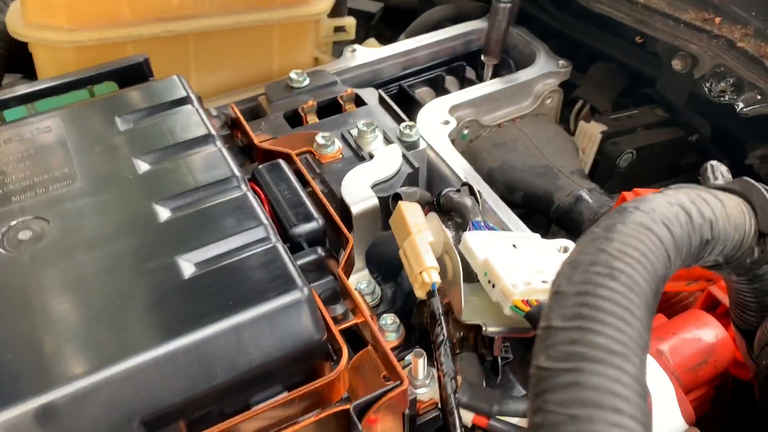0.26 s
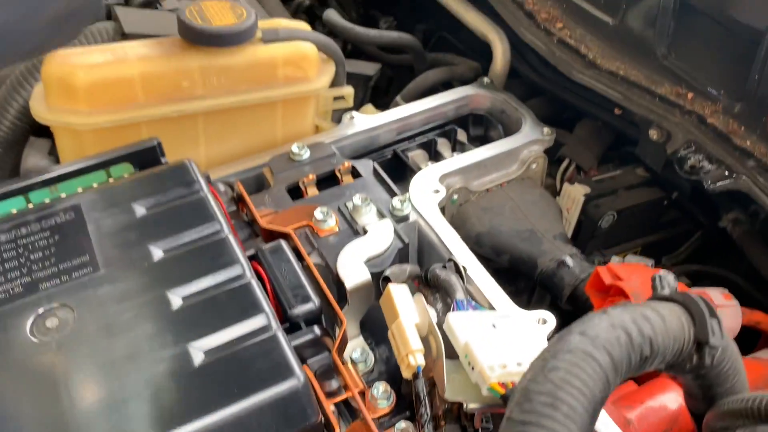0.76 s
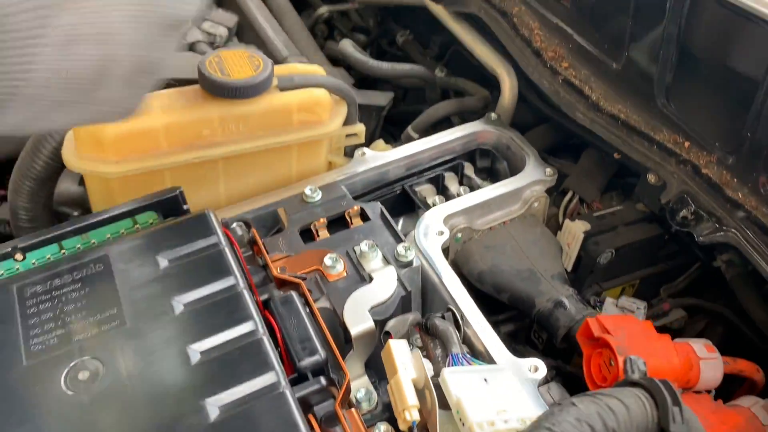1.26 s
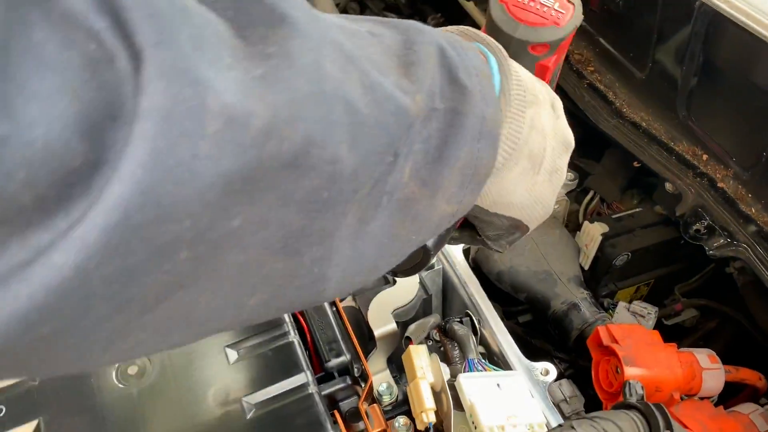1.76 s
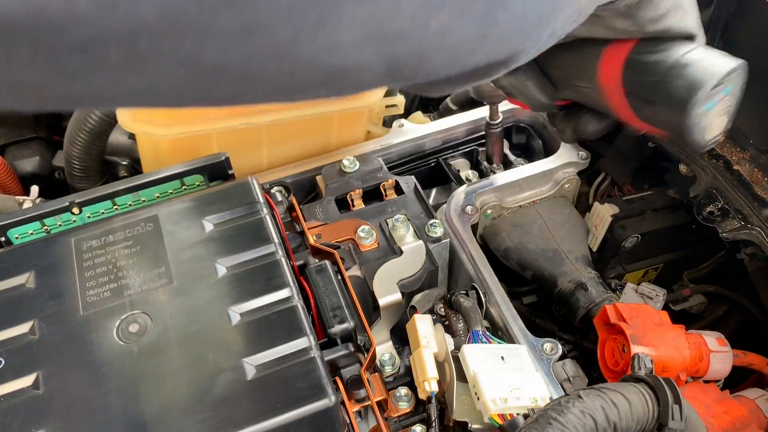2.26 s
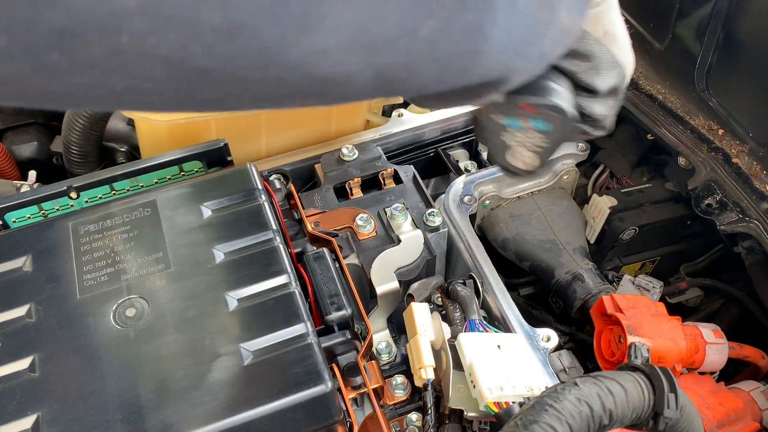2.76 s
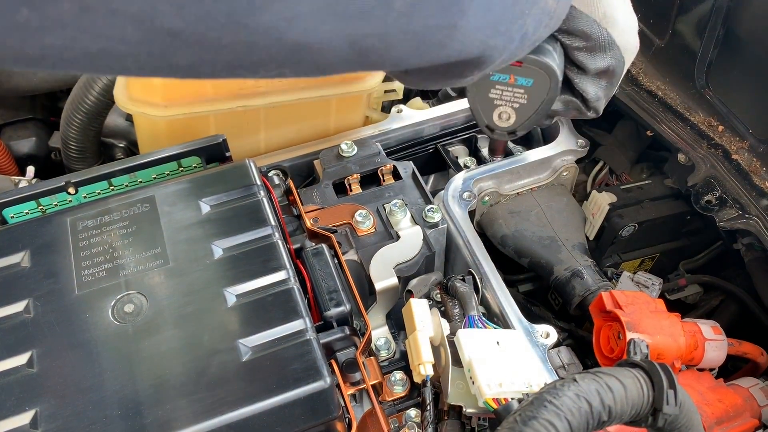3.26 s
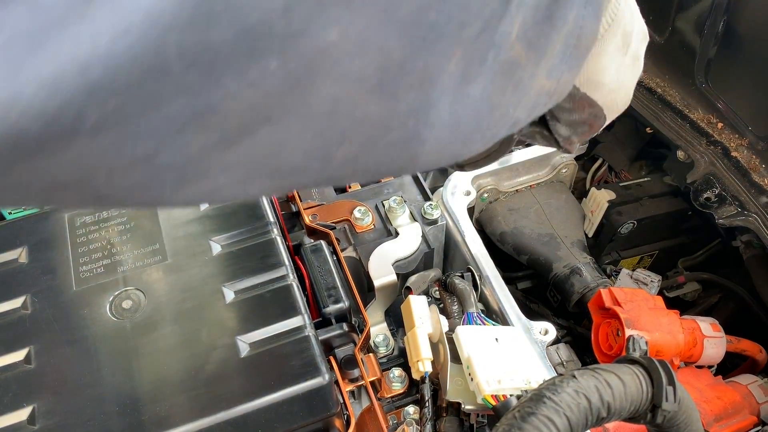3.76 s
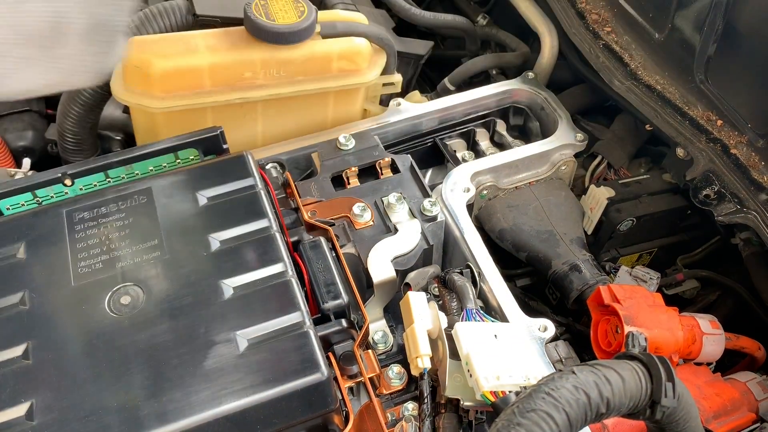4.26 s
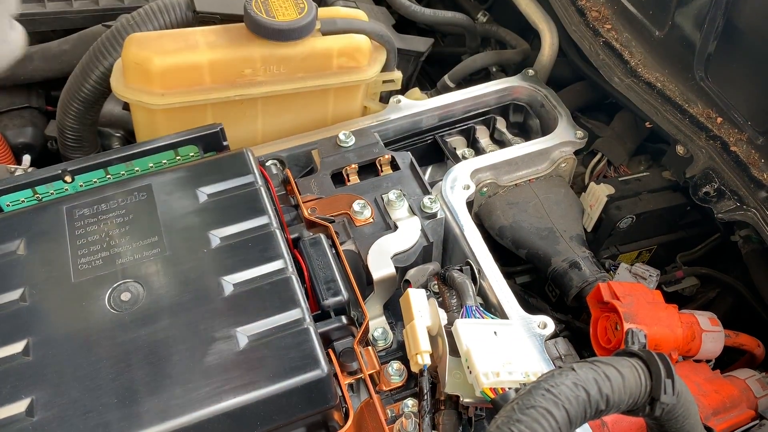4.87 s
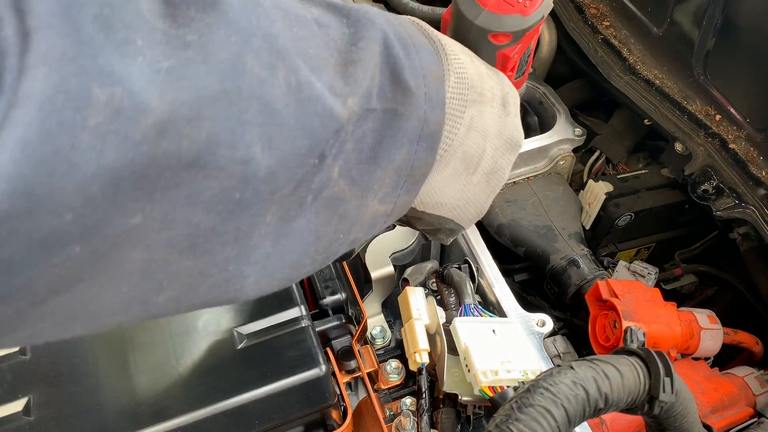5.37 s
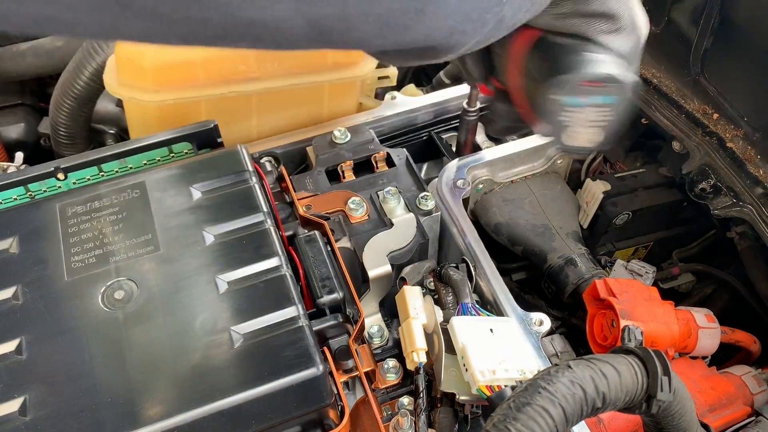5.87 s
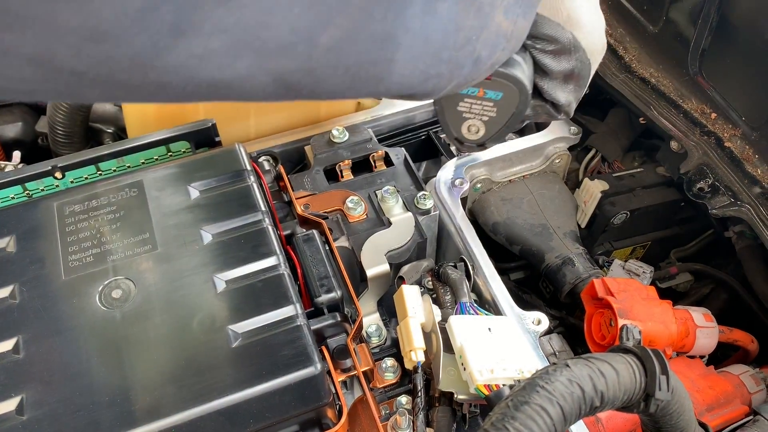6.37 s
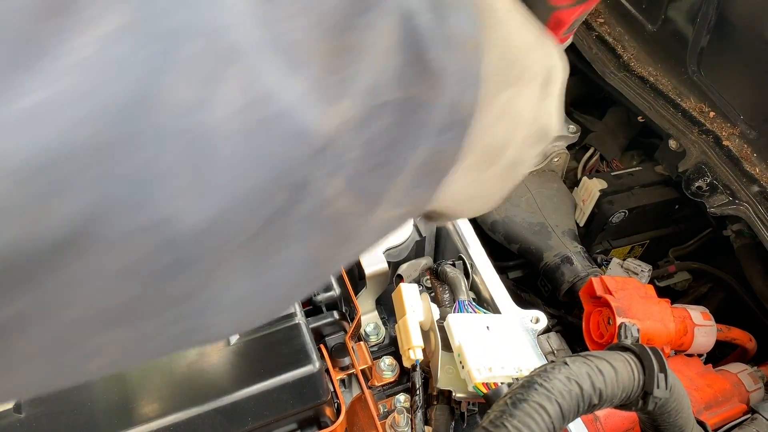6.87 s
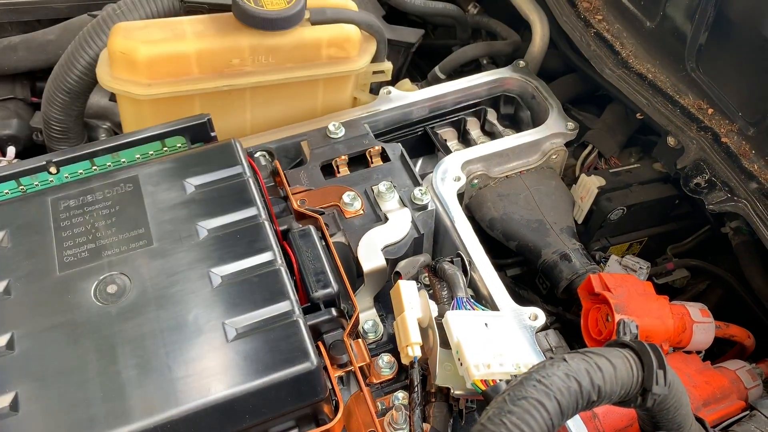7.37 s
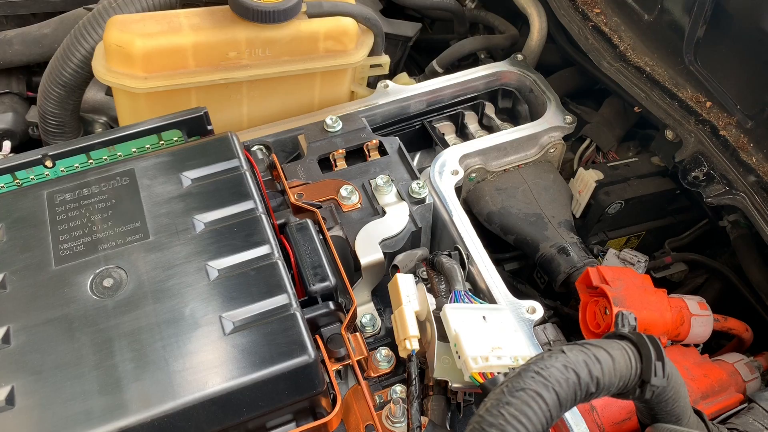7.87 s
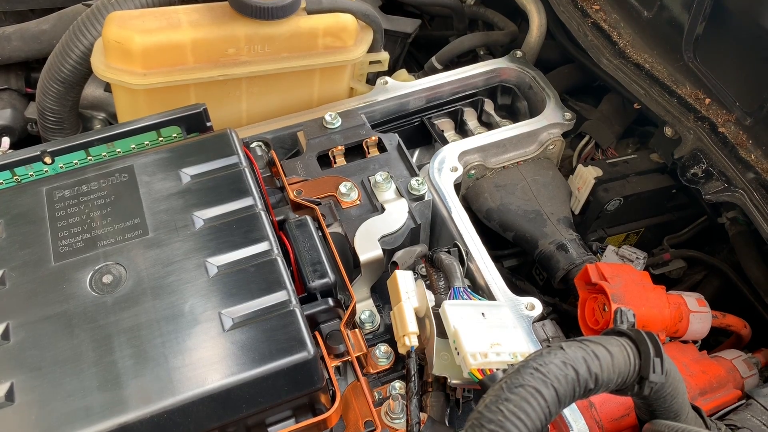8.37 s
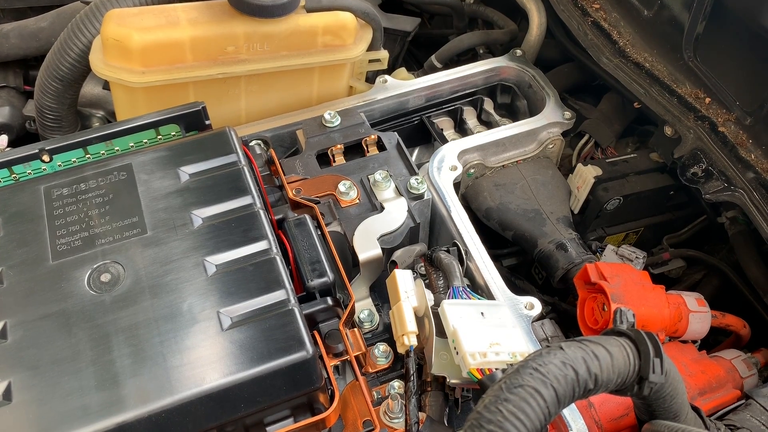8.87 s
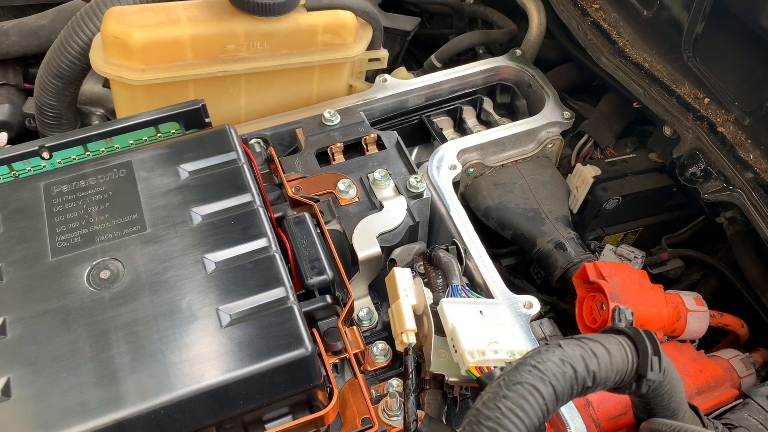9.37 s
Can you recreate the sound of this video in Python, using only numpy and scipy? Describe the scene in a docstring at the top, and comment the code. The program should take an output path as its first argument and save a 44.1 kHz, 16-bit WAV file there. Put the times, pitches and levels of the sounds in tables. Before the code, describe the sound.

Close up in an engine bay, a power driver loosens bolts in three clattering bursts, its socket knocking between them, before soft hiss and a brief drag.

```python
"""Impact driver in an engine bay

In a car's engine bay, close to the microphone, a cordless impact driver backs bolts out of an aluminium housing.
Gears whirr and whine with the motor, hammer blows clash in volleys, and the metal rings at its modes.
Between runs the socket knocks, rubs and rattles, a sleeve swishes and small parts tick; near the end
something scrapes. Behind, a workshop rumbles, far chirps come late and a soft hiss swells and stays."""
import sys
import numpy as np
from scipy import signal
from scipy.fft import rfft, irfft, next_fast_len
from scipy.io import wavfile
from scipy.ndimage import map_coordinates

SR = 44100
rng = np.random.default_rng(int(sys.argv[2]) if len(sys.argv) > 2 else 0)


def generate_wav(signal):
    """Clip the signal to [-1, 1] and save it as 16-bit WAV at the path in sys.argv[1]."""
    frames = np.transpose(np.atleast_2d(signal))
    scaled = np.clip(frames, -1, 1) * 32767
    pcm = np.round(scaled).astype(np.int16)
    wavfile.write(sys.argv[1], SR, pcm)


N = 424683
TIME = np.arange(N) / SR


def amp(db):
    """Amplitude of a level in dB."""
    return 10 ** (np.asarray(db) / 20)


def unit(x):
    """x scaled to rms 1."""
    return x / np.sqrt(np.mean(x ** 2) + 1e-20)


def along(points, hz):
    """Values at hz between (f/Hz, value) points, on a log frequency axis."""
    f, v = np.transpose(points)
    return np.interp(np.log(hz + 1), np.log(f + 1), v)


def wobble(rate):
    """A smooth random curve with this many knots a second."""
    knots = rng.standard_normal(int(N * rate / SR) + 4)
    return map_coordinates(knots, [TIME * rate], order=2)


def filtered(x, response):
    """x times a response of frequency."""
    m = next_fast_len(N + SR // 4)
    return irfft(rfft(x, m) * response(np.fft.rfftfreq(m, 1 / SR)), m)[..., :N]


# stereo width of the work close to the microphone: (f/Hz, side minus mid level/dB)
NEAR_WIDTH = [(60, -19), (87, -17.5), (130, -21), (180, -14), (260, -8), (380, -12.5), (550, -8),
              (790, 2.5), (1140, -3), (1650, -15.5), (2380, 1), (3440, 3), (4970, 5.5), (7180, -12),
              (10400, 1.5), (15000, 3.5)]
# stereo width of the workshop and of low or dragging sounds: (f/Hz, side minus mid level/dB)
SHOP_WIDTH = [(30, -29), (120, -20.5), (300, -2), (1000, 8), (4000, 1.5)]


def noise(spectrum, width, grain_db=0, patchy_db=0, direct=True):
    """Stereo noise of rms 1 in grains and patches; direct sound differs between the ports mostly in phase."""
    pair = rng.standard_normal((2, N)) * amp(grain_db * wobble(1500))
    if patchy_db:
        # patches in time and frequency, alike in both channels
        z = signal.stft(pair, nperseg=512)[2]
        patch = np.outer(np.hanning(5), np.hanning(9))
        field = signal.fftconvolve(rng.standard_normal(z.shape[1:]), patch, "same")
        pair = signal.istft(z * amp(patchy_db * unit(field)), nperseg=512)[1][:, :N]
    size = next_fast_len(N)
    hz = np.fft.rfftfreq(size, 1 / SR)
    mid, other = rfft(pair, size)
    phase_share = .82 if direct else 0  # power of the side that is the mid turned a quarter cycle
    side = 1j * np.sqrt(phase_share) * mid + np.sqrt(1 - phase_share) * other
    side = amp(along(width, hz)) * side
    stereo = np.array([mid + side, mid - side])
    return unit(irfft(amp(along(spectrum, hz)) * stereo, size)[:, :N])


def bursts(rows):
    """Envelope of contacts (t/s, level/dB, rise/s per 20 dB, t60/s): each swells to its peak and dies away."""
    power = np.zeros(N)
    for s, db, rise, t60 in rows:
        near = slice(max(int((s - .05) * SR), 0), int((s + .4) * SR))
        t = TIME[near] - s
        slope_db = np.where(t < 0, 20 * t / max(abs(rise), 1e-4), -60 * t / t60)
        power[near] += amp(db + slope_db) ** 2
    return np.sqrt(power)


def swells(rows):
    """Envelope of smooth bell-shaped strokes (t/s, level/dB, half length/s)."""
    return sum(amp(db) * np.exp(-np.minimum(((TIME - s) / half) ** 2, 50)) for s, db, half in rows)


# modes of the aluminium housing: (f/Hz, level/dB, t60/s)
HOUSING_MODES = [(138.6, -5, 0.18), (271.1, -9.5, 0.66), (311, -9, .2), (542.2, -1, .25), (599, -6, 0.18),
                 (610.7, -3.5, 0.25), (1093, 2, 0.1), (1200, -11.5, 0.043), (1461, -7.5, 0.086),
                 (1580, -5.5, .07), (1840, -4.5, 0.069), (2180, -8.5, 0.14), (2465, -4.5, 0.085),
                 (2703, -6.5, 0.063), (5992, -1.5, 0.075), (6320, -6.5, 0.053), (7680, 0, 0.03),
                 (8200, 1.5, .05)]
# modes of the casting around the first bolt: (f/Hz, level/dB, t60/s)
CORNER_MODES = [(553, 4, 0.11), (686, 3.5, .14), (763, 0.5, 0.12), (2090, -2.5, .08)]
# modes of the socket extension under load: (f/Hz, level/dB, t60/s)
EXTENSION_MODES = [(536, -2, 0.057), (590, 0, 0.046), (1087, -5.5, 0.08), (2660, -8, .05)]


def casting(x, modes):
    """A metal part's decaying modes, of random phase, rung by the force x."""
    t = np.arange(SR // 2) / SR
    ring = np.zeros(len(t))
    for hz, db, t60 in modes:
        ring += amp(db - 60 * t / t60) * np.sin(2 * np.pi * hz * t + rng.uniform(0, 2 * np.pi))
    return signal.fftconvolve(x, ring[None] / np.linalg.norm(ring), axes=1)[:, :N]


# decay of the engine bay's answer: (f/Hz, t60/s)
BAY_DECAY = [(200, .35), (1500, 0.28), (10000, 0.09)]


def bay(x):
    """Bonnet and walls answer with a tail of decaying noise; the treble dies first."""
    hz, t, z = signal.stft(rng.standard_normal((2, SR // 2)), SR, nperseg=256)
    decay = amp(-60 * t / along(BAY_DECAY, hz)[:, None])
    tail = signal.istft(z * decay, SR, nperseg=256)[1]
    return signal.fftconvolve(x, tail / np.linalg.norm(tail[0]), axes=1)[:, :N]


# bands where the two ports move against each other: (f/Hz, width/Hz, depth/dB)
ANTIPHASE = [(3164, 310, 4.5), (4930, 470, 6.5)]


def ports(x):
    """Sound bends round the microphone body; in narrow bands what both ports share cancels."""
    mid = x.mean(axis=0)

    def dips(hz):
        return amp(-sum(db * np.exp(-((hz - centre) / width) ** 2) for centre, width, db in ANTIPHASE))

    return x - mid + filtered(mid, dips)


# spectrum of the low rumble: (f/Hz, level/dB per Hz)
RUMBLE = [(12, -31), (20, -5), (43, 2), (91, -3.5), (123, -3.5), (204, -16.5), (291, -16.5), (328, -28),
          (358, -15.5), (386, -23.5), (700, -37.5), (910, -60.5), (1540, -120)]
# spectrum of the far wash: (f/Hz, level/dB per Hz)
SHOP = [(290, -30.5), (500, -20.5), (729, -6.5), (933, -9), (1090, -7.5), (1840, -10.5), (2100, -16),
        (4470, -27), (5240, -24), (16000, -45.5)]
# spectrum of the late hiss: (f/Hz, level/dB per Hz)
HISS = [(1180, -35.5), (2000, -4), (4940, -4), (8400, -4.5), (11300, -14), (12100, -34), (13300, -18.5),
        (16000, -16)]
HISS_DB, HISS_MIDWAY_S, HISS_SWELL_S = -55.5, 7.65, .16


def workshop():
    """Far behind: shaped noise as a swaying rumble, a thin wash, and a soft hiss that swells late and stays."""
    rumble = amp(-44 + .9 * wobble(6)) * noise(RUMBLE, SHOP_WIDTH, direct=False)
    wash = amp(-58.5 + 1.2 * wobble(5.1)) * noise(SHOP, SHOP_WIDTH, patchy_db=2, direct=False)
    hiss_gain = amp(HISS_DB) / (1 + np.exp((HISS_MIDWAY_S - TIME) / HISS_SWELL_S))
    return rumble + wash + hiss_gain * noise(HISS, SHOP_WIDTH, direct=False)


# the driver's runs: (trigger squeezed t/s, bolt breaks loose t/s, trigger released t/s,
# free motor speed f/Hz, whirr level/dB)
RUNS = [(-0.4, -0.299, 0.125, 364, -19.5), (3.032, 3.15, 3.514, 417.8, -19.5),
        (6.063, 6.16, 6.555, 414.6, -20)]
ATTACK_S, ATTACK_DB, RELEASE_DB_PER_S = 0.069, 22.5, 205  # the whirr climbs this far in this time; its fall
LOAD_SAG_HZ, SPIN_UP_S = 100.1, .085  # a tight bolt holds the motor back; time constant of its recovery
LOAD_DIP_DB, SWELL_S = 5, .17  # the whirr is softer under load; time constant of its swell


def drive():
    """Gain and speed/Hz of the motor: held back under load, faster and louder once the bolt is loose."""
    effort, speed = np.zeros(N), np.zeros(N)
    for on, loose, off, free_hz, db in RUNS:
        run = TIME >= on
        t = TIME[run]
        free_s = np.maximum(t - loose, 0)
        attack_db = ATTACK_DB * np.maximum(1 - (t - on) / ATTACK_S, 0)
        load_db = LOAD_DIP_DB * np.exp(-free_s / SWELL_S)
        release_db = RELEASE_DB_PER_S * np.maximum(t - off, 0)
        effort[run] = amp(db - attack_db - load_db - release_db)
        speed[run] = free_hz - LOAD_SAG_HZ * np.exp(-free_s / SPIN_UP_S)
    return effort, speed


# spectrum of the gear noise: (f/Hz, level/dB per Hz)
WHIRR = [(240, -49), (400, -12.5), (562, -13), (839, -4), (1070, 0), (1870, 0), (2400, -7), (3160, -6),
         (8110, -5), (11000, -12.5), (11800, -31.5), (12300, -59.5), (12900, -26), (13500, -10),
         (16000, -31)]
# whining gear orders: (multiple of the motor speed, level/dB within the whine)
GEAR_ORDERS = [(4, -6), (6, -3), (8, -8), (18, -1), (21, -5), (24, -2)]


def motor():
    """Gears whirr as noise pulsing once a turn, and whine at multiples of the motor's speed."""
    effort, speed = drive()
    turns = np.cumsum(speed * (1 + .005 * wobble(60))) / SR
    mesh = 1 + 0.22 * np.cos(2 * np.pi * turns)  # the teeth bite harder once a turn
    whirr = amp(2 + wobble(150)) * noise(WHIRR, NEAR_WIDTH, grain_db=0.6, patchy_db=3.0) * mesh
    whine = np.zeros(N)
    for order, db in GEAR_ORDERS:
        phase = 2 * np.pi * order * turns + 0.31 * wobble(200)
        whine += amp(db + 4 * wobble(60)) * np.sin(phase)
    return effort * (whirr + amp(-13) * whine)


# spectrum of shaking metal and low bumps: (f/Hz, level/dB per Hz)
SHUDDER = [(25, -12), (50, -2), (90, -0.5), (145, 1), (220, -3), (300, -12.5), (500, -18), (900, -59.5)]
SHUDDER_DB, JOLT_SHUDDER_DB, SHUDDER_T60_S = -17, -7.5, .35  # relative to the motor's gain, to a jolt; decay


def shudder():
    """The housing shakes as low noise with the motor, most after each jolt."""
    effort, _ = drive()
    jolted = bursts((s + .015, db + JOLT_SHUDDER_DB, .02, SHUDDER_T60_S) for s, db in JOLTS)
    return (amp(SHUDDER_DB) * effort + jolted) * noise(SHUDDER, SHOP_WIDTH)


# volleys of hammer blows: (first blow t/s, number of blows, gap/s, clash level/dB, body level/dB),
# both levels before the trims in hammer()
VOLLEYS = [(-0.008, 4, .0197, -4, -12.5), (0.0693, 4, .0197, -6.5, -18), (3.0792, 2, .0195, -8, -6),
           (3.1074, 2, .0075, -5.5, -16), (3.1345, 2, .006, -3.5, -12.5), (3.3577, 3, .0206, -4, -13),
           (3.441, 5, .02, -7, -21.5), (3.5435, 5, .0127, -9, -24.5), (6.104, 2, .027, -15, -18),
           (6.377, 8, .0203, -5, -19)]
# lone blows as the bolt gives or the hammer lets go: (t/s, clash level/dB, body level/dB), before the same trims
LAST_BLOWS = [(0.174, -9.5, -17), (6.1474, -1.5, -12), (6.5735, -9.5, -22.5)]
# spectrum of bright steel: (f/Hz, level/dB per Hz)
STEEL = [(1470, -39), (2500, -3), (3230, -7.5), (5070, -2.5), (5780, 0.5), (8140, -2.5), (10500, -8),
         (12000, -26.5), (14600, -7.5), (16000, -20)]
# spectrum of dull metal on metal: (f/Hz, level/dB per Hz)
DULL_METAL = [(150, -18), (260, -9), (380, -13), (570, -2), (800, -11), (1100, 0.5), (2150, -3),
              (3100, -14.5), (4200, -11.5), (5000, -20.5), (9000, -29.5), (14000, -59)]
BLOW_SCATTER_DB = 1.1  # from one volley blow to the next


def hammer():
    """The hammer strikes in even volleys; each blow is a bright steel clash over a thud through the bolt."""
    blows = list(LAST_BLOWS)
    for s, count, gap, db, body_db in VOLLEYS:
        for k in range(round(count)):
            blows.append((s + k * gap, db + BLOW_SCATTER_DB * rng.standard_normal(), body_db))
    clash = bursts((s + 0.0023, db - 4.0, .003, .032) for s, db, _ in blows)
    thud = bursts((s + .002, body_db - 5, .003, .05) for s, _, body_db in blows)
    steel = noise(STEEL, NEAR_WIDTH, grain_db=1.4, patchy_db=1.5)
    return clash * steel + thud * noise(DULL_METAL, NEAR_WIDTH, grain_db=0.3, patchy_db=3.5)


# the driver's recoil jolts the housing: (t/s, level/dB before the trims in jolts() and shudder())
JOLTS = [(0.009, -18.5), (3.099, -20.5), (3.164, -20), (6.133, -21.5), (6.172, -22), (6.429, -21),
         (6.65, -29)]


def jolts(mount_hz=142, t60=0.15):
    """The heavy housing nods on its mounts, each nod a decaying low sine."""
    out = np.zeros(N)
    t = np.arange(SR // 3) / SR
    for s, db in JOLTS:
        envelope = amp(db - 3 - 60 * t / t60) * (1 - np.exp(-t / 0.0039))
        out[round(s * SR):][:len(t)] += envelope * np.sin(2 * np.pi * mount_hz * t)
    return out


# swishes of sleeve and glove as the arm moves: (t/s, level/dB, half length/s)
BRUSHES = [(0.622, -43, .03), (1.03, -64.5, .09), (1.68, -55.5, .05), (2.3, -49, 0.045), (2.45, -53.5, .05),
           (2.97, -59, .1), (4.177, -38, 0.031), (4.77, -60, .06), (5.85, -55, 0.17), (7.373, -41, 0.028)]
# spectrum of cloth: (f/Hz, level/dB per Hz)
CLOTH = [(410, -56.5), (700, -22), (1260, -6.5), (2990, -21), (3790, -16.5), (5060, -20), (7790, -12.5),
         (10500, -20.5), (12200, -25.5), (16000, -20.5)]
WORK_ENDS_S, RUB_DB = 7.5, -68


def sleeve():
    """Cloth rubs faintly for as long as the arm moves, with swishes of noise over it."""
    rub = amp(RUB_DB + 1.8 * wobble(30) + 1.4 * wobble(4)) * (TIME < WORK_ENDS_S)
    return (rub + swells(BRUSHES)) * noise(CLOTH, NEAR_WIDTH, grain_db=2.0, patchy_db=3.5)


# shuffles of the tool until the socket seats: (t/s, level/dB before the trims in rattle() and socket(),
# half length/s)
FUMBLE = [(2.519, -49, .19), (3.021, -47.5, .09), (5.9, -50.5, .14)]
RATTLE_DB, RATTLE_SCATTER_DB = 3, 2.5  # light contacts, relative to the shuffle's level
KNOCK_RISE_S = 0.0046


def rattle(count=5):
    """Envelope of the light chance contacts in each shuffle of the tool."""
    contacts = []
    for s, db, half in FUMBLE:
        for _ in range(count):
            contact_s = s + half * rng.uniform(-1.5, 1.5)
            contact_db = db + RATTLE_DB + RATTLE_SCATTER_DB * rng.standard_normal()
            contacts.append((contact_s, contact_db, KNOCK_RISE_S, .06))
    return bursts(contacts)


# socket knocks on bolt heads and housing: (t/s, knock level/dB, click level/dB), before the trims in socket()
KNOCKS = [(0.254, -17, -21), (1.92, -17, -38), (1.947, -33, -37), (2.126, -14, -32), (2.133, -17, -26.5),
          (2.202, -31, -60), (2.276, -18.5, -38), (2.314, -18.5, -30.5), (2.401, -21.5, -55),
          (2.448, -19, -32), (2.506, -24, -47.5), (2.547, -8, -11), (2.802, -22.5, -54), (2.87, -29, -52.5),
          (2.978, -34, -41.5), (3.684, -26, -28), (3.712, -25.5, -22.5), (5.455, -19, -36),
          (5.501, -17, -42), (5.615, -33, -58), (5.646, -29.5, -55), (5.682, -16.5, -40),
          (5.796, -23, -40.5), (5.844, -20.5, -38.5), (5.947, -21, -51), (6.037, -25.5, -39.5)]
# skids of the socket on a bolt head: (t/s, level/dB, rise/s, t60/s)
SKIDS = [(0.235, -34.5, .012, 0.18), (2.130, -32, 0.019, 0.064), (2.549, -26, 0.0092, 0.054),
         (3.695, -29, .02, .11), (5.458, -33, 0.016, 0.061), (5.505, -35, 0.018, 0.078),
         (5.82, -42, 0.07, 0.27)]


def socket():
    """The socket rubs, rattles and skids on the metal, knocks and clicks; the tool's weight adds a low bump."""
    knock = bursts((s + 0.002, db - 10.5, KNOCK_RISE_S, .07) for s, db, _ in KNOCKS)
    click = bursts((s + 0.0018, click_db + 0.5, KNOCK_RISE_S, .035) for s, _, click_db in KNOCKS)
    bump = bursts((s + 0.0063, db - 25, .006, .25) for s, db, _ in KNOCKS)
    rub = amp(-9.5 + 3.3 * wobble(50)) * swells(FUMBLE)
    dull = knock + bursts(SKIDS) + rub + rattle()
    metal = dull * noise(DULL_METAL, NEAR_WIDTH, grain_db=1.5, patchy_db=1.5)
    bright = click * noise(STEEL, NEAR_WIDTH, grain_db=6.5, patchy_db=2.0)
    return metal + bright + bump * noise(SHUDDER, SHOP_WIDTH)


# soft taps on hollow plastic: (t/s, level/dB before the trim in taps(), f/Hz)
TAPS = [(0.649, -50.5, 2100), (0.935, -47.5, 1110), (1.02, -44, 856), (1.233, -43.5, 870),
        (4.612, -37.5, 2110), (4.692, -37, 824), (4.884, -39, 813), (7.081, -43, 766.1), (8.914, -44, 650)]


def taps(t60=0.028):
    """Hollow plastic answers a touch with one short note, rough from a randomly drifting phase."""
    out = np.zeros(N)
    t = np.arange(SR // 8) / SR
    for s, db, hz in TAPS:
        phase = 2 * np.pi * hz * t + 0.054 * np.cumsum(rng.standard_normal(len(t)))
        envelope = amp(db + 1.0 - 60 * t / t60) * (1 - np.exp(-t / 0.001))
        out[round(s * SR):][:len(t)] += envelope * np.sin(phase)
    return out


# light ticks of tool and plastic: (t/s, tick level/dB, snap level/dB), before the trims in ticks()
TICKS = [(0.903, -35, -46), (0.923, -32, -44.5), (1.229, -21, -36), (1.877, -29.5, -48.5),
         (3.619, -12, -25.5), (4.407, -31, -47.5), (4.427, -29.5, -35.5), (4.439, -19.5, -23),
         (4.607, -32, -55.5), (4.628, -27, -50), (4.69, -36.5, -53), (5.926, -27.5, -60.5),
         (6.624, -17, -41.5), (6.672, -23, -35.5), (6.708, -12.5, -33.5)]
# spectrum of a tick's body: (f/Hz, level/dB per Hz)
TICK = [(400, -27), (800, -6.5), (2200, -4), (3100, -13.5), (4000, -8.5), (5000, -9.5), (7000, -1),
        (10500, -7), (12500, -22.5), (16000, -23.5)]
# spectrum of a tick's bright edge: (f/Hz, level/dB per Hz)
SNAP = [(6000, -30.5), (10000, -4), (13500, -1), (16000, -1)]


def ticks():
    """Small parts tick: a short burst of noise with a shorter, brighter snap."""
    tick = bursts((s + 0.0027, db - 8.0, .003, .035) for s, db, _ in TICKS)
    snap = bursts((s + .002, snap_db + 4, .002, .025) for s, _, snap_db in TICKS)
    body = tick * noise(TICK, NEAR_WIDTH, grain_db=3.0, patchy_db=1.5)
    return body + snap * noise(SNAP, NEAR_WIDTH, grain_db=1.0)


def trigger(start_hz=10100, sag_per_s=.7, level_db=-41):
    """A thin whistle as the trigger is squeezed, sagging in pitch as the motor takes up the load."""
    out = np.zeros(N)
    t = np.arange(SR // 10) / SR
    phase = 2 * np.pi * start_hz * (t - sag_per_s * t * t / 2)
    whistle = amp(level_db) * signal.windows.tukey(len(t), .2) * np.sin(phase)
    for on, *_ in RUNS:
        if on > 0:
            out[round(on * SR):][:len(t)] += whistle
    return out


# the clearest far chirps: (t/s, level/dB before the trim in chirps(), f/Hz)
CHIRPS = [(7.5, -45.5, 1700), (7.635, -44, 2318), (7.659, -42.5, 2474), (7.791, -44.5, 2313),
          (7.822, -42, 1709), (8.082, -47.5, 2290), (8.745, -46, 1872), (8.838, -45, 1745)]
TWITTER_START_S, TWITTER_S, TWITTER_DB = 7.5, 1.5, -50.5  # fainter chirps between them, before the same trim
TWITTER_HZ, TWITTER_SPREAD = 2310, 0.18  # middle pitch and spread of log pitch


def chirps(glide_per_s=3, half=0.0095, count=14):
    """Faint, rough, rising chirps from far off, thinning out and blurred by the walls."""
    out = np.zeros(N)
    t = np.arange(-SR // 20, SR // 20) / SR
    calls = list(CHIRPS)
    for _ in range(count):
        s = TWITTER_START_S + TWITTER_S * rng.triangular(0, .2, 1)
        calls.append((s, TWITTER_DB, TWITTER_HZ * np.exp(TWITTER_SPREAD * rng.standard_normal())))
    for s, db, hz in calls:
        roughness = 0.13 * np.cumsum(rng.standard_normal(len(t)))
        phase = 2 * np.pi * hz * (t + glide_per_s * t * t / 2) + roughness
        chirp = amp(db - 6.0) * np.exp(-(t / half) ** 2) * np.sin(phase)
        out[round((s + t[0] + .005) * SR):][:len(t)] += chirp
    return out + amp(-4.0) * bay(out[None])


# scrapes of something dragged briefly: (t/s, level/dB, rise/s, t60/s)
SCRAPES = [(9.352, -26, 0.0035, 0.37), (9.396, -17, 0.016, 0.26), (9.451, -32, 0.028, .4),
           (9.595, -35, .012, .4)]
# spectrum of the scrape: (f/Hz, level/dB per Hz)
SCRAPE = [(88, -40), (150, -10), (303, -6.5), (702, -15), (1660, -3.5), (3220, -9.5), (3840, -4),
          (4760, -13), (9080, -10.5), (12200, -35.5), (13400, -23.5), (16000, -22)]


def scrape():
    """Something is dragged briefly: overlapping bursts of grainy noise."""
    drag = bursts((s + rise, db, rise, t60) for s, db, rise, t60 in SCRAPES)
    return drag * noise(SCRAPE, SHOP_WIDTH, grain_db=1.5, patchy_db=2.5, direct=False)


def scene():
    """Tool and hands up close, the metal they ring, the bay's answer and the workshop behind."""
    driver, knocks = motor() + hammer(), socket()
    housing = casting(amp(-13.5) * driver + amp(-11.5) * knocks, HOUSING_MODES)
    on_first_bolt = TIME < RUNS[1][0]
    corner = amp(-8.0) * casting(driver * on_first_bolt, CORNER_MODES)
    extension = amp(-18) * casting(driver, EXTENSION_MODES)
    tool = driver + knocks + shudder() + jolts() + trigger()
    hands = sleeve() + taps() + ticks() + scrape()
    near = tool + hands + housing + corner + extension
    return ports(near + amp(-15) * bay(near)) + chirps() + workshop()


def record(dry, notch_hz=12200, width_hz=600, depth_db=8, top_hz=16100):
    """The microphone rounds off the highest peaks, has a notch in the high treble and a steep band limit."""
    rounded = dry / (1 + np.abs(dry) ** 6) ** (1 / 6)  # never beyond full scale

    def response(hz):
        notch_db = -depth_db * np.exp(-((hz - notch_hz) / width_hz) ** 2)
        return amp(notch_db) * (hz < top_hz)

    return filtered(rounded, response)


dry = scene()
out = record(dry)
generate_wav(out)
```